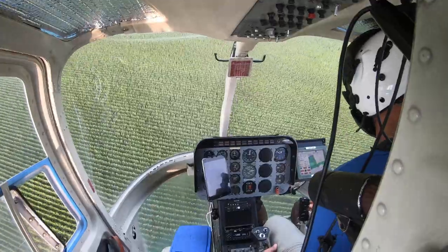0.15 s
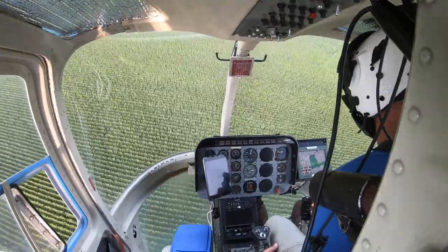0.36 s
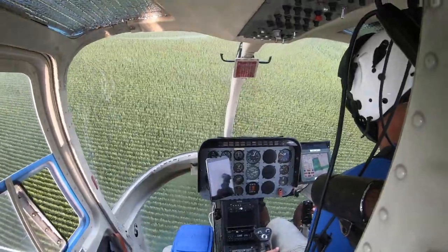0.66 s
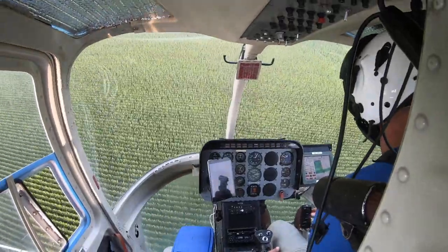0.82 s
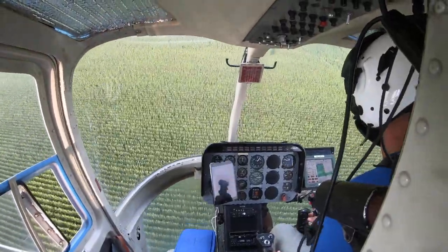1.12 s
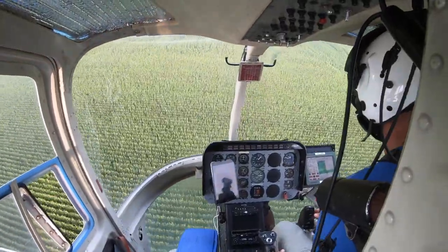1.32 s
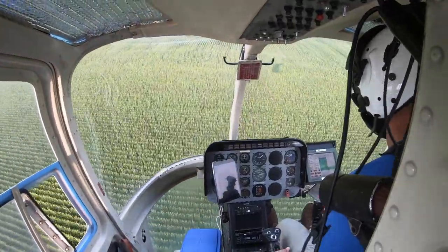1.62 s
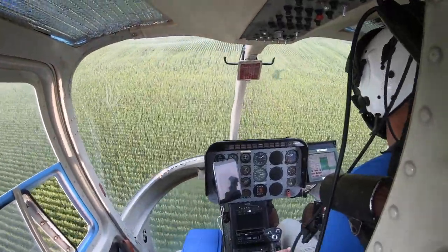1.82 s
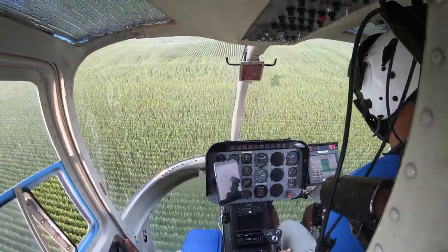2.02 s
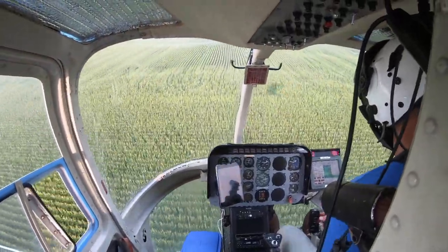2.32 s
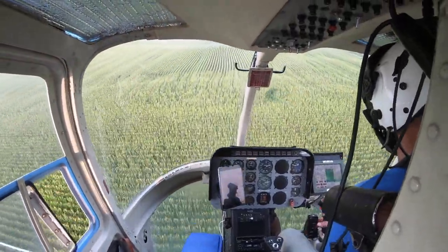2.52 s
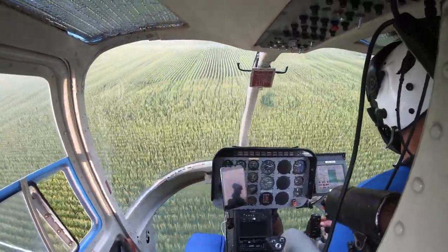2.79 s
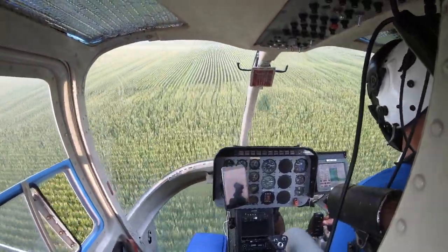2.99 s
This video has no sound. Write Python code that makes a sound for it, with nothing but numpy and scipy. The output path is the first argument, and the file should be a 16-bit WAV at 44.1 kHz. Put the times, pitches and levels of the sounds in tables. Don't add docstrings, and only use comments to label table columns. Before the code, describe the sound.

A turbine helicopter runs continuously from 0 to about 3.1 seconds, heard inside the cabin. Rotor thumps pulse rapidly, about thirteen a second, over low hum, steady mid-pitched gear whine and broad air rumble with faint chopped hiss. Weak panel ticks hide around 0.5-0.9, 1.5 and 1.8 seconds. From about 1.8 the engine whine creeps upward and the throb grows slightly heavier. The small microphone sounds compressed, mildly overloaded.

```python
import sys
import numpy as np
from scipy import signal
from scipy.io import wavfile
from scipy.ndimage import uniform_filter1d

SR = 44100
rng = np.random.default_rng(int(sys.argv[2]) if len(sys.argv) > 2 else 0)


def how_loud(loudness_db):
    steps = np.asarray(loudness_db, float) / 20
    return 10 ** steps


def dump_mix(stems):
    frames = np.atleast_2d(stems).T
    limited = np.clip(frames, -1, 1)
    pcm = np.round(limited * 32767).astype(np.int16)
    wavfile.write(sys.argv[1], SR, pcm)


N = 138915

# (time [s], speed [% of normal])
ROTOR_SPEED = [(0, 99.0), (.2, 99.55), (.4, 99.88), (.8, 100.27), (1.0, 100.12), (1.8, 99.96),
               (2.3, 100.02), (2.7, 99.93), (3.15, 99.68)]
# (time [s], speed [turns/s])
CORE_SPEED = [(0, 759.3), (.2, 764.8), (.4, 767.9), (.65, 769.6), (1.2, 767.7), (1.6, 768.2), (1.8, 769.6),
              (2.4, 779.2), (3.15, 787.2)]
ROTOR_HZ, TAIL_HZ, SHAFT_HZ, TURBINE_HZ = 6.391, 41.35, 97.368, 538.8
START_TURN = -.644
IDLE_HZ, PULL_HZ = 768, 20


def evened(x):
    return x / np.sqrt(np.mean(x ** 2) + 1e-20)


def curve(points, at):
    return np.interp(at, *np.transpose(points))


def colour(points, hz, skirt_db=-60):
    f, db = np.transpose(points)
    octave = np.log2(hz + 1)
    below = np.maximum(np.log2(f[0] + 1) - octave, 0)
    above = np.maximum(octave - np.log2(f[-1] + 1), 0)
    return np.interp(octave, np.log2(f + 1), db) + skirt_db * (below + above)


def drift(rate_hz, slowest_hz=0.3926):
    t = np.arange(N)[::64] / SR
    f = np.geomspace(slowest_hz, rate_hz, num=16)[:, None]
    slow = np.sin(2 * np.pi * (f * t + rng.random(f.shape))).sum(0)
    return np.interp(np.arange(N) / SR, t, evened(slow))


def tone(turns, db, waver_db=3.0, wobble=.02):
    level = how_loud(db + waver_db * drift(30, slowest_hz=1.624))
    return np.sqrt(2) * level * np.cos(2 * np.pi * (turns + wobble * drift(25)))


T = np.arange(N) / SR
SPUN = np.cumsum(curve(ROTOR_SPEED, T) / 100) / SR
BLADES = 2 * (ROTOR_HZ * SPUN + START_TURN)
PULL = (curve(CORE_SPEED, T) - IDLE_HZ) / PULL_HZ


def rotors():
    # (time [s], level [dB])
    loading = [(0, -19.5), (.35, -23), (.75, -19), (.95, -23), (1.15, -20.5), (1.4, -18.5), (1.7, -17.5),
               (2.2, -16), (2.5, -17), (2.8, -16.5), (3.15, -16.5)]
    blade_orders = [(1, -.3), (2, .3), (3, .3), (4, .02), (5, .15), (6, -.2)]
    thump_db = [-20, -19.5, 0.5, -6.5, -20, -14]
    tail_orders = [1, 2, 4, 6, 10, 40.03]
    tail_db = [-35.5, -28, -30.5, -36, -37, -51.5]
    load = curve(loading, T)
    out = np.zeros(N)
    for (k, lead), db in zip(blade_orders, thump_db):
        out += tone(k * BLADES + lead, load + db, waver_db=0.2, wobble=0.058)
    for k, db in zip(tail_orders, tail_db):
        out += tone(k * TAIL_HZ * SPUN + rng.random(), db, waver_db=3.5)
    return out


def gearbox():
    # (time [s], level [dB])
    torque = [(0, -5), (.15, -0.6), (.5, .1), (.85, 2), (1.3, -.5), (1.8, .1), (2.1, 0), (2.6, -0.2),
              (3.15, -1.5)]
    shaft_orders = [1, 2, 10, 19, 25, 26.135, 37.737, 38, 48.33, 50, 57]
    # (level [dB], change at full pull [dB])
    shaft_levels = [(-25.5, -5), (-35, -7), (-39.5, 2.5), (-33.5, -3.5), (-49.5, 5), (-60, 5.5),
                    (-55, -0.5), (-53, -11.5), (-73.5, 1), (-47.5, 1), (-64, 4)]
    ring_orders = [(1, 0, 0), (1, 1, .1), (1, -1, 0), (1, -2, .3), (1, -3, 0), (1, 2, -.35), (1, 3, .08),
                   (2, 0, 0), (2, 1, .2), (2, -1, -.18), (2, 2, .5), (2, 3, .3), (2, -3, .5), (3, 0, 0),
                   (3, 1, -.4), (3, 3, -.25)]
    ring_db = [-22, -35, -41, -40, -42.5, -38, -41, -39.5, -40.5, -51.5, -49, -41, -57.5, -48.5, -48.5, -48]
    out = np.zeros(N)
    for k, (db, pull_db) in zip(shaft_orders, shaft_levels):
        level = db + pull_db * PULL + curve(torque, T)
        out += tone(k * SHAFT_HZ * SPUN + rng.random(), level, waver_db=.8, wobble=.02)
    for side in (-2, 2):
        out += tone(shaft_orders[3] * SHAFT_HZ * SPUN + side * BLADES, shaft_levels[3][0] - 27)
    ring = 98 * BLADES / 2 + 0.024 * drift(20)
    for (k, side, lead), db in zip(ring_orders, ring_db):
        turns = k * ring + side * BLADES + lead
        out += tone(turns, db - 1.4 * k * PULL, waver_db=.9 * k, wobble=.015)
    return out


def engine():
    # (time [s], level [dB])
    airflow = [(0, -5), (.2, 5.5), (.4, -2), (1.0, .1), (1.7, 4), (2.0, -1), (2.6, -5), (2.8, 0.5),
               (3.15, -0.5)]
    core_orders = [.946, 1, 2.838, 3, 4, 6.138, 7.084, 8.085, 16]
    # (level [dB], change at full pull [dB])
    whine = [(-38.5, 6.5), (-21, -5), (-57, 0), (-67.5, -12), (-53, -2), (-66, 5.5), (-52.5, 1.5),
             (-77.5, 3), (-74, 5)]
    turbine_orders = [1, 25]
    turbine_db = [-35.5, -77]
    turns = np.cumsum(curve(CORE_SPEED, T)) / SR
    out = np.zeros(N)
    for k, (db, pull_db) in zip(core_orders, whine):
        share = min(k - 1, 6) / 6
        level = db + pull_db * PULL + share * curve(airflow, T)
        out += tone(k * turns + rng.random(), level, waver_db=0.84 + 0.15 * min(k, 8), wobble=.03)
    for k, db, pull_db in zip(turbine_orders, turbine_db, (-.3, 4)):
        out += tone(k * TURBINE_HZ * SPUN, db + pull_db * PULL, waver_db=4.0, wobble=0.018)
    return out


def panel():
    # (time [s], level [dB])
    ticks = [
        (0.457, -35),
        (0.679, -37),
        (0.773, -33),
        (.925, -32.5),
        (1.544, -33.5),
        (1.84, -37.5),
    ]
    t = np.arange(2000) / SR
    band = signal.butter(4, [900, 2800], "band", fs=SR, output="sos")
    out = np.zeros(N + len(t))
    for s, db in ticks:
        noise = evened(signal.sosfilt(band, rng.standard_normal(len(t))))
        puff = noise * (t / 0.0044) * np.exp(1 - t / 0.0084)
        start = round((s - .007) * SR)
        out[start:start + len(t)] += how_loud(db) * puff
    return out[:N]


def air(points, db, size, patch_db, swell_db, pull_db, lag, uneven_db=0.):
    # (frequency [Hz], depth [dB])
    chop_depth = [(1000, .8), (3000, .8), (6000, .3), (7700, 1.8), (9200, 4), (11000, 5.5), (13000, 4),
                  (14500, 5.5)]
    hop = size // 4
    frames, hz = N // hop + 5, np.fft.rfftfreq(size, 1 / SR)
    a, b, patches = rng.standard_normal((frames, len(hz), 3)).T
    patches = uniform_filter1d(patches, size // 64, axis=0)
    patches = evened(uniform_filter1d(patches, 2048 // hop, axis=1))
    t = np.arange(frames) * hop / SR
    blades = np.interp(t, T, BLADES) - lag
    chop = np.cos(2 * np.pi * blades) + uneven_db * np.cos(np.pi * blades)
    chop_hz, chop_db = np.transpose(chop_depth)
    depth = np.interp(np.log(hz + 1), np.log(chop_hz), chop_db)
    field = colour(points, hz)[:, None] + patch_db * patches + depth[:, None] * chop
    noise = signal.istft((a + 1j * b) * how_loud(field), nperseg=size, noverlap=size - hop)[1][:N]
    return evened(noise) * how_loud(db + swell_db * drift(10) + pull_db * PULL)


def slipstream():
    # (frequency [Hz], level [dB per Hz])
    rumble_colour = [(8, -14), (20, -15), (38, 1), (70, -3.5), (120, -8), (170, 1), (210, -11), (245, -6)]
    # (frequency [Hz], level [dB per Hz])
    roar_colour = [(260, 4), (540, -2.5), (700, -3), (1000, -7.5), (1150, -14), (1260, -11.5), (1500, -21),
                   (1870, -17.5)]
    # (frequency [Hz], level [dB per Hz])
    body_colour = [(1900, -0.5), (2150, -4.5), (2450, -3), (3300, -8.5), (4400, -14.5), (4850, -11),
                   (5000, -19), (5300, -18.5)]
    # (frequency [Hz], level [dB per Hz])
    hiss_colour = [(5600, -6.5), (7800, 1), (8800, -4), (11000, -6), (11600, -10), (12700, -10),
                   (14300, -21), (15000, -27)]
    rumble = air(rumble_colour, -18, size=4096, patch_db=-0.96, swell_db=0.3, pull_db=-0.2, lag=.1)
    roar = air(roar_colour, -22.5, size=2048, patch_db=0.0, swell_db=1.48, pull_db=0.0, lag=0.46)
    body = air(body_colour, -37.2, size=512, patch_db=.8, swell_db=.4, pull_db=.2, lag=.65)
    hiss = air(hiss_colour, -54.5, size=512, patch_db=.8, swell_db=.25, pull_db=.4, lag=.0, uneven_db=.25)
    return rumble + roar + body + hiss


def scene():
    return (rotors() + gearbox() + engine() + panel() + slipstream())[None]


def low_pass(x):
    return signal.sosfilt(signal.butter(12, 15140, fs=SR, output="sos"), x)


def record(dry):
    power = uniform_filter1d(dry ** 2, 2600, axis=1, mode="reflect")
    steadied = dry * (power / power.mean()) ** -.15
    overloaded = np.tanh(steadied / 1.237) * 1.297 - .002
    return low_pass(overloaded)


dry = scene()
out = record(dry)
dump_mix(out)
```